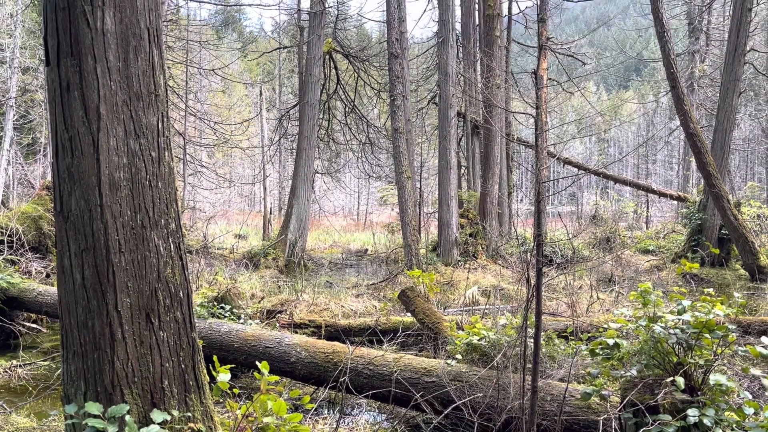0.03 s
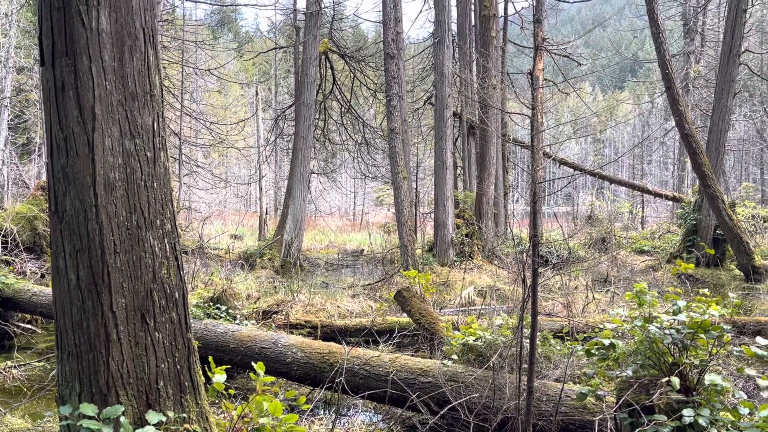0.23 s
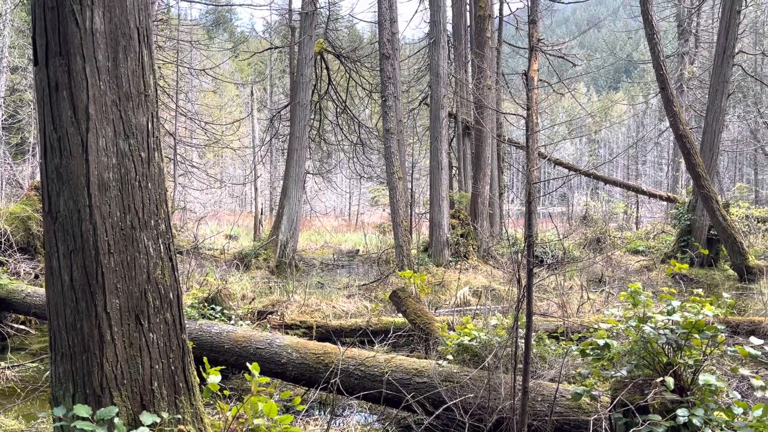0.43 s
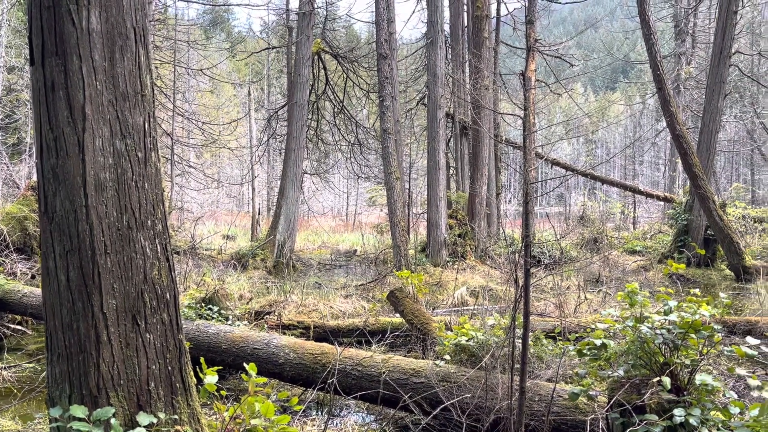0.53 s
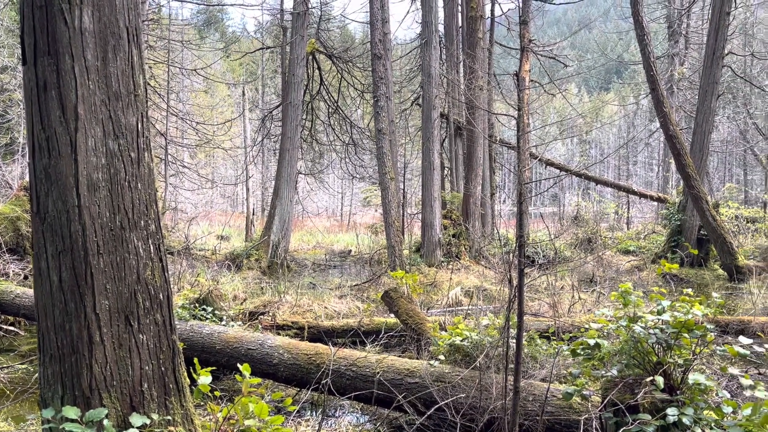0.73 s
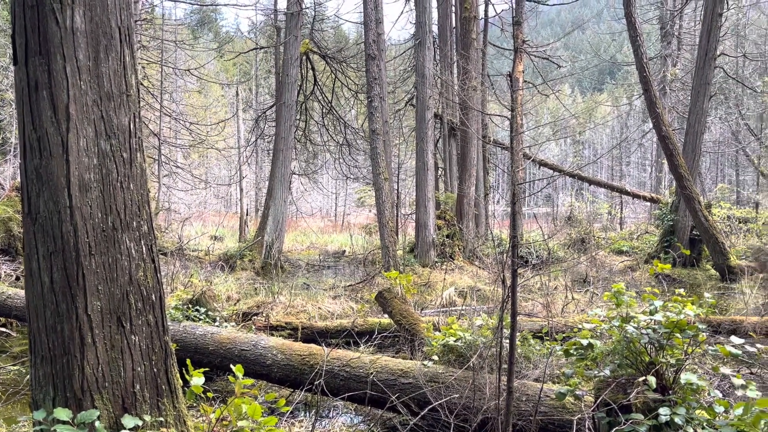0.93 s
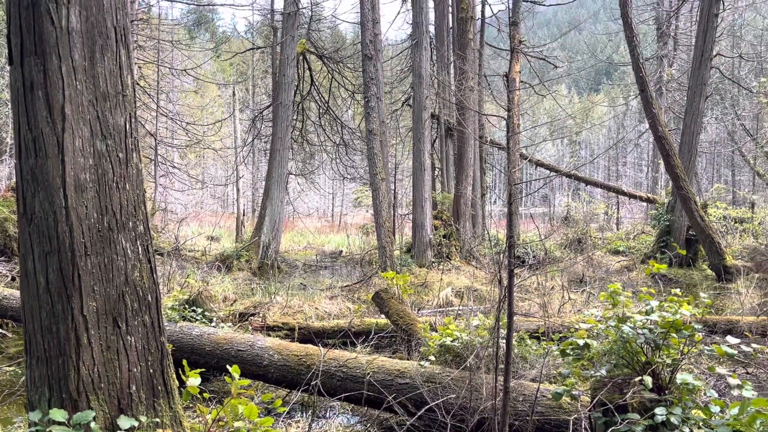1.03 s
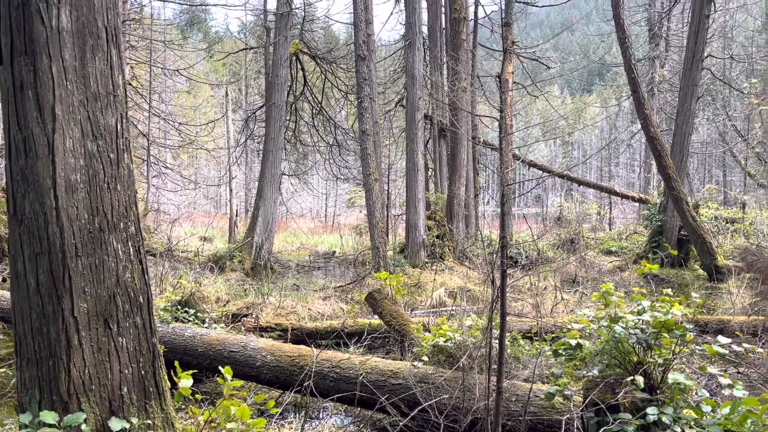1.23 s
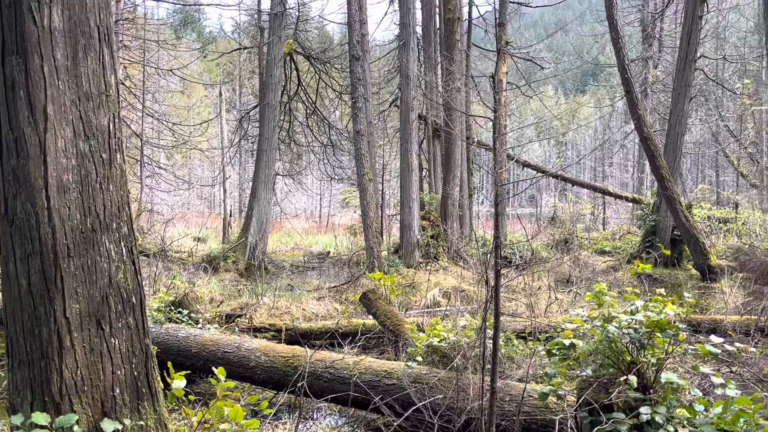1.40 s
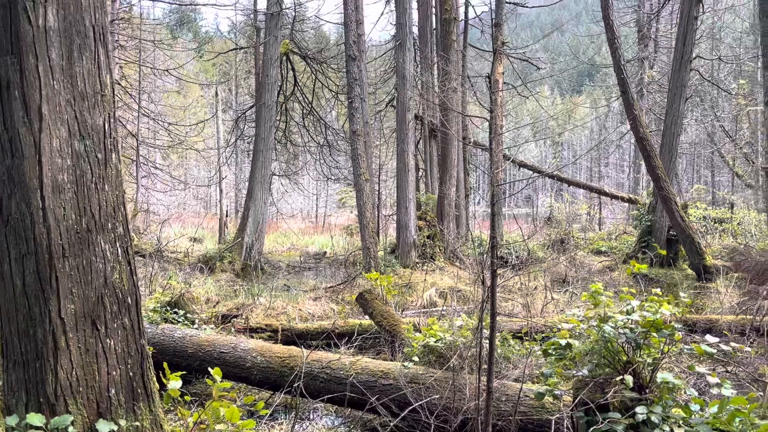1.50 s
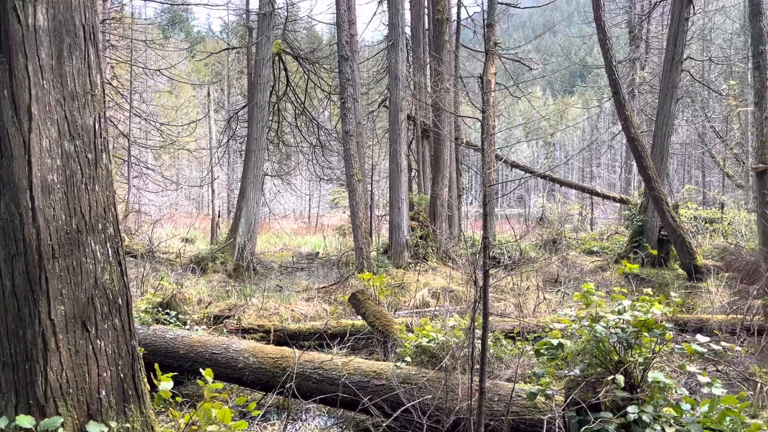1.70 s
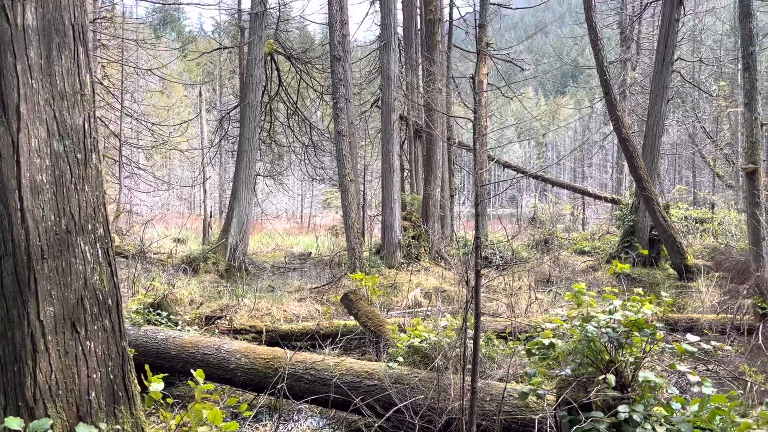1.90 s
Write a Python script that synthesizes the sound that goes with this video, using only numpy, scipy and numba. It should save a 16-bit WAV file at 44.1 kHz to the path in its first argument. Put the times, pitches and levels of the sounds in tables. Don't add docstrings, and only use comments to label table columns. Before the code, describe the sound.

Chorus frogs creak in a wooded swamp, one near two-part call over a shimmering distant crowd

```python
import sys
import numpy as np
from scipy import signal
from scipy.fft import rfft, irfft
from scipy.io import wavfile
from scipy.ndimage import uniform_filter1d
from numba import njit

SR = 44100
rng = np.random.default_rng(int(sys.argv[2]) if len(sys.argv) > 2 else 0)


def boost_factor(decibels):
    exponent = np.asarray(decibels, float) / 20
    return 10 ** exponent


def dump_mix(stems):
    frames = np.atleast_2d(stems).T
    limited = np.clip(frames, -1, 1)
    pcm = np.round(limited * 32767).astype(np.int16)
    wavfile.write(sys.argv[1], SR, pcm)


N = 85995

ATTACK_S, RELEASE_S = 0.003, 0.0035
FAR_ROUGH = 0.09


def level(x, db):
    return x * boost_factor(db) / np.sqrt(np.mean(x ** 2))


def walk(rate):
    hold = int(SR / rate)
    steps = np.repeat(rng.standard_normal(N // 100), hold)[:N]
    return 1.52 * uniform_filter1d(uniform_filter1d(steps, hold), hold)


def add(out, start_s, x):
    i = int(start_s * SR)
    a, b = max(i, 0), min(i + x.shape[-1], N)
    if b > a:
        out[..., a:b] += x[..., a - i:b - i]


def pulse(db, hz, hold, partials_db, turn, rough, attack=ATTACK_S):
    t = np.arange(int((attack + hold + 4 * RELEASE_S) * SR)) / SR
    late = np.maximum(t - attack, 0)
    swell = np.sin(np.pi / 2 * np.minimum(t / attack, 1)) ** 2
    env = swell * boost_factor(-400 * late)
    env = env * np.exp(-(np.maximum(late - hold, 0) / RELEASE_S) ** 2 / 2)
    tremor = rng.standard_normal(2500)
    for _ in range(3):
        tremor = uniform_filter1d(tremor, 80)
    tremor = 12 * rough * tremor[:len(t)]
    sag_per_s = 3.5 / (1 + hold / 0.002)
    phase = np.pi * hz * (t - sag_per_s * t * (t / 2 - attack)) + turn
    tone = sum(boost_factor(p) * np.sin(k * phase + k * k * tremor) for k, p in enumerate(partials_db, 1))
    return boost_factor(db) * env * tone


def near_frog():
    # t/s, peak level/dB, second partial f/Hz, hold/s
    creak = [(.489, -50, 1530, .001), (0.512, -51, 1760, 0.0014), (0.535, -44, 1825, .001),
             (0.547, -38, 1906, 0.0012), (0.5635, -35, 1930, 0.00091), (0.5806, -31, 1923, .001),
             (0.5988, -28.5, 1972, .001), (0.617, -26, 2017, 0.00074), (0.6346, -26.5, 1992, 0.0012),
             (0.6562, -36, 1992, 0.0042), (0.7696, -23, 2038, 0.00073), (0.7872, -20.5, 2057, .002),
             (0.8017, -24, 2081, 0.015)]
    partials_db = [-21.5, -0.5, -29.5, -48]
    out = np.zeros(N)
    for s, db, hz, hold in creak:
        attack = 0.0046 if s < 0.7 else ATTACK_S
        start = s - attack + 0.002
        add(out, start, pulse(db, hz, hold, partials_db, 0, 0.04, attack))
        if 0.5 < s < 0.7:
            sac = pulse(-54, 2 * 810, 0.003, [0], 0, 4 * FAR_ROUGH, attack)
            rasp = pulse(-64, 2 * 3280, 0.003, [0], 0, 12 * FAR_ROUGH, attack)
            add(out, start, sac + rasp)
    return out


def note(out, start, length, db, hz, rate, partials_db, chance):
    for k in range(int(length * rate) + 1):
        rest = 1 - min(k / rate / length, 1)
        late, stress, detune, turn = chance[k]
        pulse_db = db - 6 * rest ** 2 + 0.5 * stress
        pulse_hz = hz * (1 - 0.10 * rest * length / 0.16) * (1 + 0.0088 * detune)
        x = pulse(pulse_db, pulse_hz, 0.00033, partials_db, 9 * turn, FAR_ROUGH)
        add(out, start + k / rate + 0.0012 * late, x)
    return out


def other_frogs():
    # t/s, length/s, peak level/dB, final f/Hz, first partial level/dB
    answers = [(0.026, 0.068, -46, 2255, -13.5), (0.198, 0.11, -47, 2350, -4),
               (0.293, 0.096, -42.5, 2072, -14), (0.359, 0.075, -39.5, 2340, -13),
               (0.686, .035, -44.5, 2496, -3.5), (1.16, 0.081, -46.5, 2380, -1.5),
               (1.224, 0.13, -47, 2044, 0.5), (1.298, 0.047, -37.5, 2269, -10),
               (1.376, 0.052, -40, 2300, -10.5), (1.423, 0.063, -40.5, 2100, -3.5),
               (1.43, 0.077, -39.5, 2198, -13), (1.57, 0.043, -35.5, 2335, -9),
               (1.79, 0.058, -51, 2290, -12.5)]
    upper_db = [-0.5, -28, -51.5]
    # t/s, peak level/dB, f/Hz, hold/s
    held = [
        (.512, -38.5, 2162, .012),
        (.534, -40.5, 2153, .012),
        (.719, -38, 2400, .010),
        (.718, -43.5, 2150, .006),
        (0.729, -40.5, 2645, .019),
        (.733, -39.5, 2166, 0.023),
        (1.466, -42, 2196, 0.0053),
        (1.596, -45.5, 2317, 0.0087),
    ]
    held_partials_db = [-14, 0, -34, -60]
    out, chance = np.zeros((2, N)), rng.standard_normal((len(answers), 30, 4))
    for (s, length, db, hz, low_db), c in zip(answers, chance):
        call = note(np.zeros(N), s, length, db, hz, 64, [low_db] + upper_db, c)
        lean_db = 0.6 * c[-1, 0] * np.array([[1], [-1]])
        out = out + call * boost_factor(lean_db)
    for s, db, hz, hold in held:
        add(out, s, pulse(db, hz, hold, held_partials_db, 0, FAR_ROUGH))
    return out


@njit
def walls(x, lags, gain, damp):
    line, soft, out = np.zeros((8, 8192)), np.zeros(8), np.zeros((2, len(x)))
    for i in range(len(x)):
        total = 0.
        for k in range(8):
            soft[k] += (1 - damp) * (gain[k] * line[k, (i - lags[k]) & 8191] - soft[k])
            total += soft[k]
            out[k % 2, i] += soft[k]
        for k in range(8):
            line[k, i & 8191] = x[i] + soft[k] - total / 4
    return out


def wood(x):
    lags = np.array([691, 887, 1123, 1361, 1637, 1949, 2273, 2657])
    gain = boost_factor(-60 * lags / SR / 0.4)
    return walls(x + 1e-18, lags, gain, 0.13) / 2


def crowd(count):
    # t/s, level/dB
    effort = [(0, -50.5), (0.149, -50.5), (.3, -48.5), (.42, -51), (.49, -49.5), (0.599, -48), (.69, -49),
              (.84, -47.5), (.92, -50.5), (1.09, -48.5), (1.249, -51), (1.449, -47.5), (1.546, -52.5),
              (1.62, -46.5), (1.767, -52.5), (1.82, -49), (1.95, -52)]
    partials_db = [-9.5, 0.5, -25.5, -50]
    out = np.zeros((2, N))
    who, chance = rng.standard_normal((count, 4)), rng.standard_normal((count, 30, 4))
    for k, (w, c) in enumerate(zip(who, chance)):
        start = -0.2 + (N / SR + 0.2) * k / count + 0.02 * w[0]
        length = 0.06 + 0.09 * (k % 3 > 0)
        hz = 2278.3 + 129.4 * np.clip(w[2], -1.2, 2)
        note(out[k % 2], start, length, -3 * w[1], hz, 57 + 5 * w[3], partials_db, c)
    wet = wood(out[0] + out[1])
    direct = 1.3 * out.sum(axis=0) + 0.15 * (out - out[::-1])
    mix = level(wet, 0) + level(direct, 0)
    return level(mix, 0) * boost_factor(np.interp(np.arange(N) / SR, *np.array(effort).T))


def drone():
    # level/dB, drift/(dB/s), beat f/Hz, t of a null/s, share of the second path
    overtones = [
        (-55.5, -2.5, 1.0, 0.25, 0.72),
        (-59.5, -10.5, 0.89, 0.87, .6),
        (-58, 1, 1.15, 0.023, .4),
        (-67.5, 7, 1.05, .85, .85),
        (-81.5, 4.5, 0.72, 0.47, .6),
        (-85, 3.5, .5, 0.84, 0.29),
    ]
    t = np.arange(N) / SR
    base_hz, sag_hz_per_s = 99.03, 0.63
    phase = 2 * np.pi * (base_hz * t - sag_hz_per_s * (t - 1) ** 2 / 2)
    side, out = np.array([[1], [-1]]), 0
    for k, (db, drift_db, beat, null, share) in enumerate(overtones, 1):
        paths = 1 - min(share, .95) * np.exp(2j * np.pi * beat * (t - null))
        lean = 4.5 * min(k - .8, 1.3) * base_hz / 1000 * walk(2.8) * side
        flutter_db = 1.9 * walk(13)
        gain = boost_factor(db + drift_db * (t - 1) + flutter_db - 3.0 / 2 * side)
        turn = k * phase + 0.57 * walk(4.7) + lean / 2
        out = out + (gain * paths * np.exp(1j * turn)).real
    return out


def bird():
    # t/s, length/s, level/dB, f/Hz, glide f/Hz
    lisps = [
        (.35, .03, -93, 8500, -200),
        (.62, .045, -91, 8100, -100),
        (.714, .012, -79, 8200, -300),
        (.733, .014, -80, 8050, -200),
        (.75, .08, -86, 7900, 400),
        (.834, .04, -87.5, 8200, -100),
        (.88, .05, -95.5, 8000, -100),
    ]
    out, wobble = np.zeros(N), 1.2 * walk(350)
    for s, length, db, hz, glide_hz in lisps:
        t = np.arange(int(length * SR)) / SR
        phase = 2 * np.pi * (hz * t + glide_hz * t * t / length / 2) + wobble[int(s * SR):][:len(t)]
        add(out, s, boost_factor(db) * np.sin(np.pi * t / length) * np.sin(phase))
    return out * boost_factor(4 * walk(200))


def ticks():
    # t/s, level/dB, f/Hz, width f/Hz
    touches = [
        (.0538, -65, 11200, 3000),
        (.0540, -72, 14800, 1200),
        (1.6062, -72, 15000, 1200),
        (1.795, -80, 5700, 1500),
    ]
    out, t = np.zeros(N), np.arange(1000) / SR
    for (s, db, hz, width_hz), n in zip(touches, rng.standard_normal((len(touches), len(t)))):
        band = [hz - width_hz / 2, hz + width_hz / 2]
        sos = signal.butter(2, band, "bandpass", fs=SR, output="sos")
        x = signal.sosfilt(sos, n * np.exp(-t / 0.003))
        add(out, s, boost_factor(db) * x / np.abs(x).max())
    return out


def coloured_noise(points, db, wide_hz):
    f = np.maximum(np.arange(N // 2 + 1) * SR / N, 1)
    hz, gain_db = np.array(points).T
    shape = boost_factor(np.interp(np.log(f), np.log(hz), gain_db, left=-60, right=-32 + gain_db[-1]))
    mid, side = rfft(rng.standard_normal((2, N)))
    side = side * 1.2 * f / (f + wide_hz)
    return level(irfft(shape * np.array([mid + side, mid - side]), N), db)


def air_and_hiss():
    # f/Hz, level/dB per Hz
    air = [(25, -12.5), (65, 3.5), (170, -3), (420, -10.5), (700, -20), (1600, -16), (3500, -26.5),
           (4500, -45)]
    # f/Hz, level/dB per Hz
    hiss = [(3500, 1.5), (5000, 0), (6800, -9.5), (8500, -5), (11300, -12.5), (12000, -24.5)]
    rumble = coloured_noise(air, -60.5, 298) * boost_factor(1.5 * walk(3.5))
    return rumble + coloured_noise(hiss, -89, 3000)


def scene():
    near, others, song = near_frog(), other_frogs(), bird()
    echoes = wood(boost_factor(-23) * near + boost_factor(-4.5) * others.mean(axis=0) + boost_factor(-3) * song)
    floor = air_and_hiss()
    front = near * boost_factor(np.array([[-.3], [.3]]))
    return front + others + echoes + crowd(count=110) + drone() + floor + song + ticks()


def top_cut(x):
    return signal.sosfilt(signal.butter(12, 15500, fs=SR, output="sos"), x)


def record(dry):
    return top_cut(dry)


dry = scene()
out = record(dry)
dump_mix(out)
```